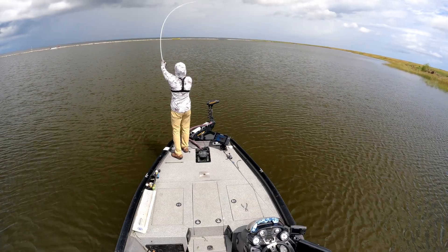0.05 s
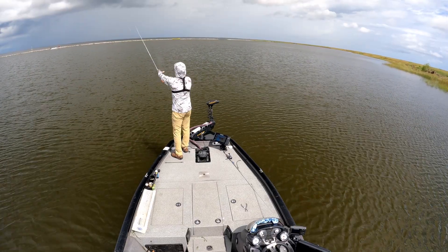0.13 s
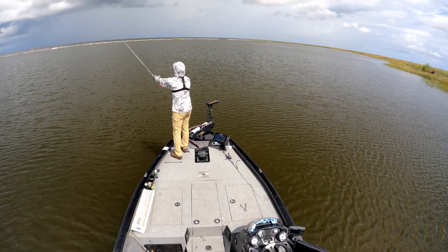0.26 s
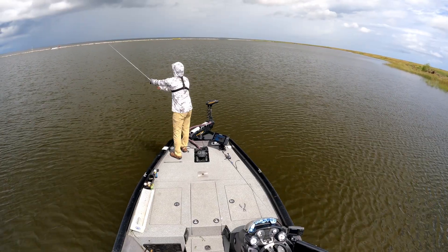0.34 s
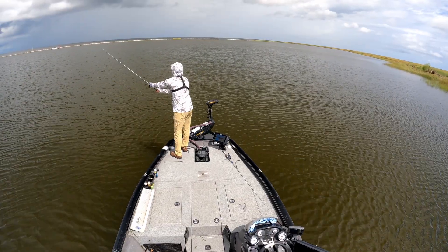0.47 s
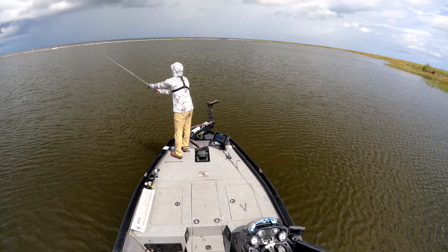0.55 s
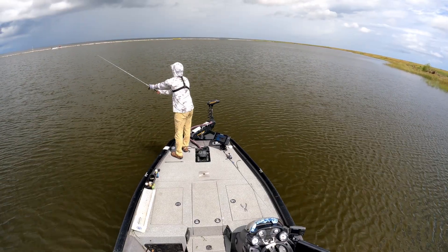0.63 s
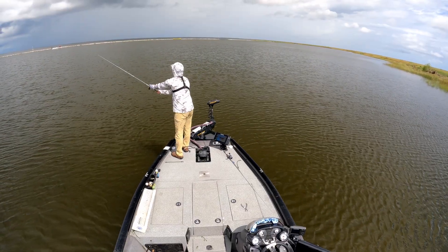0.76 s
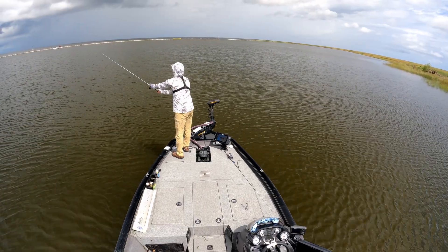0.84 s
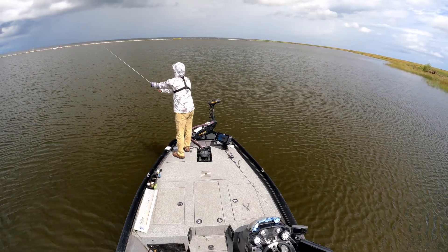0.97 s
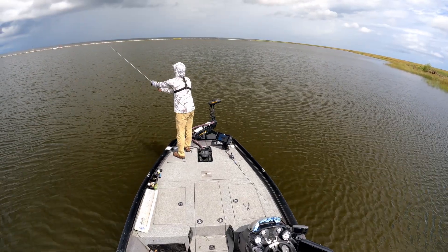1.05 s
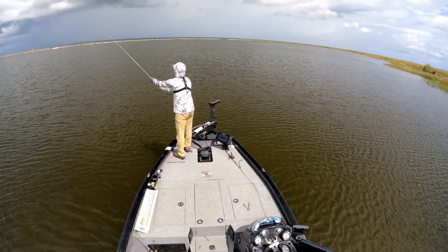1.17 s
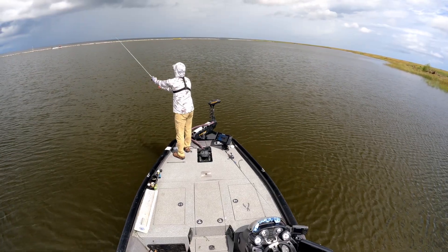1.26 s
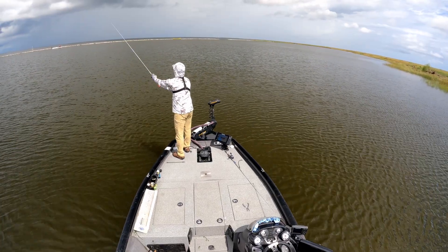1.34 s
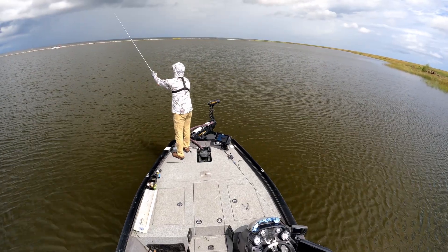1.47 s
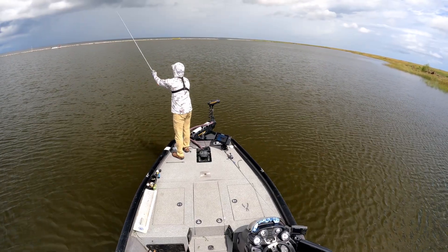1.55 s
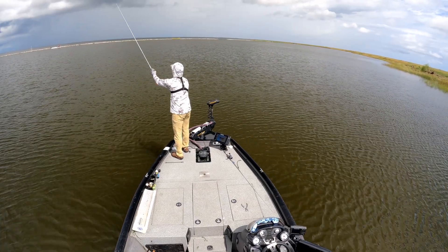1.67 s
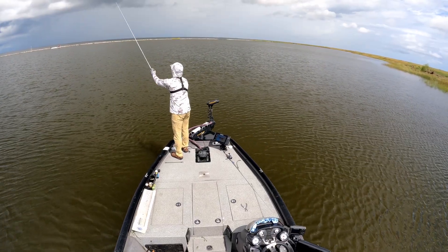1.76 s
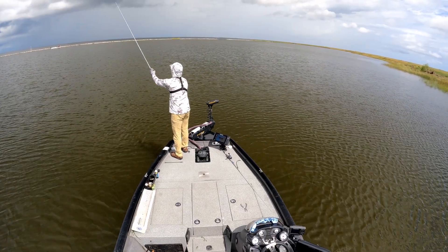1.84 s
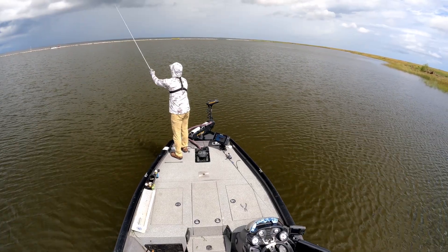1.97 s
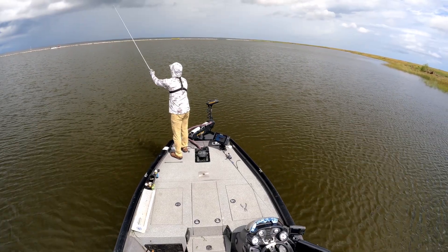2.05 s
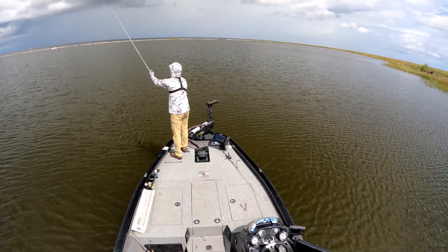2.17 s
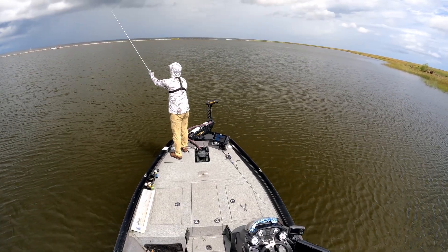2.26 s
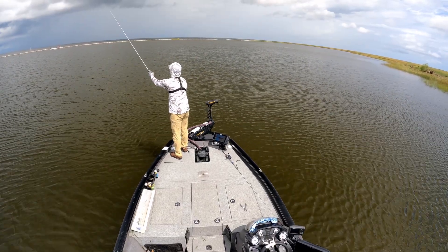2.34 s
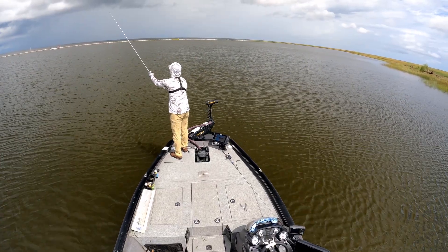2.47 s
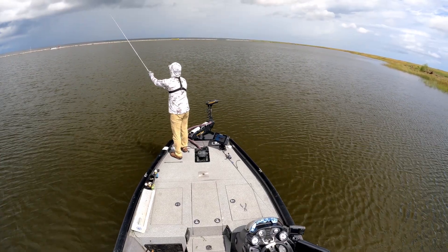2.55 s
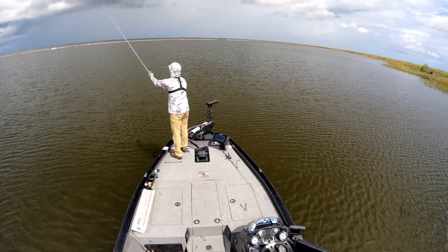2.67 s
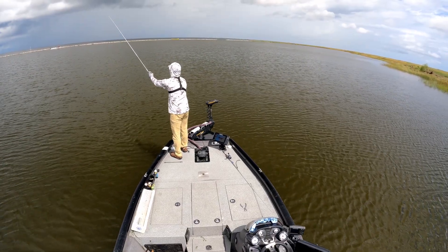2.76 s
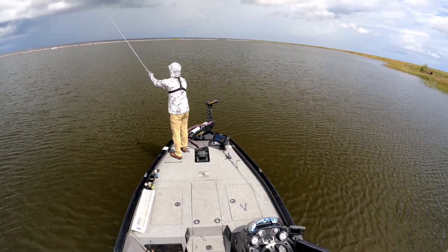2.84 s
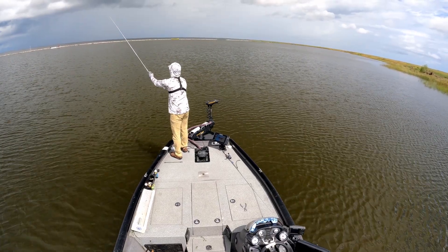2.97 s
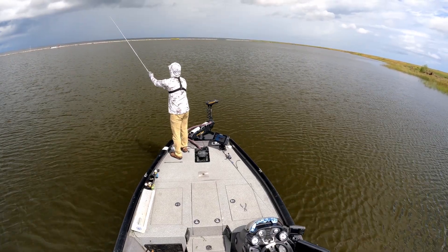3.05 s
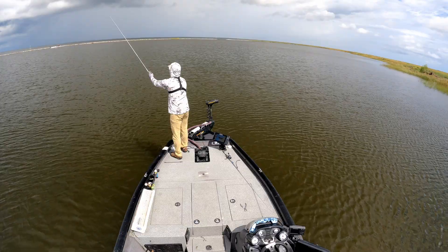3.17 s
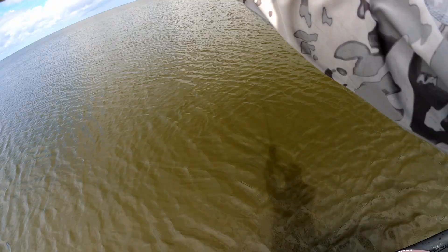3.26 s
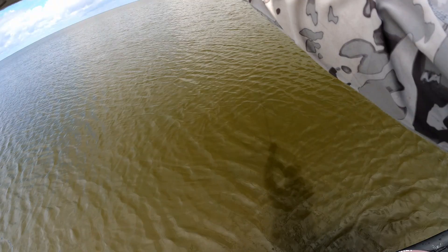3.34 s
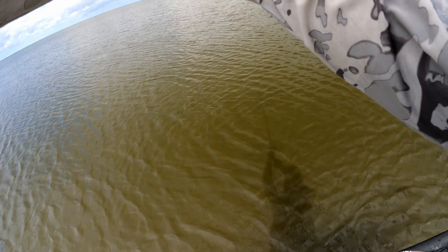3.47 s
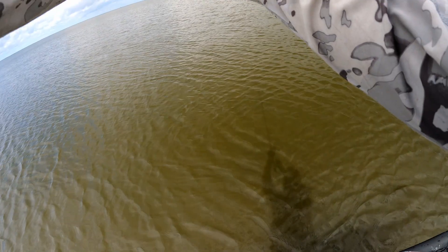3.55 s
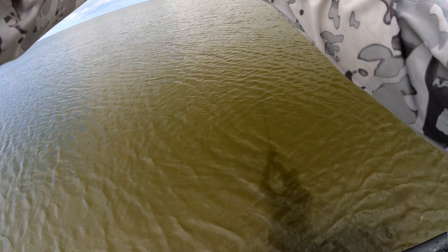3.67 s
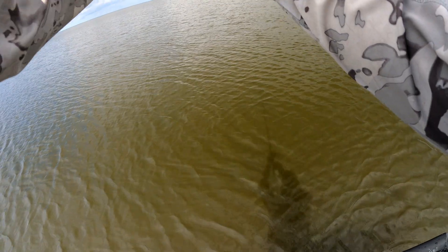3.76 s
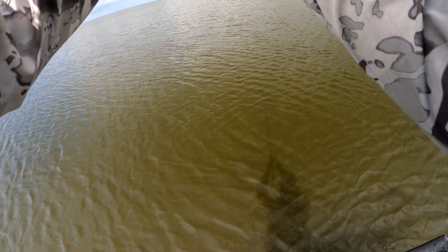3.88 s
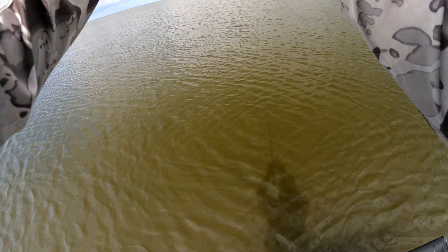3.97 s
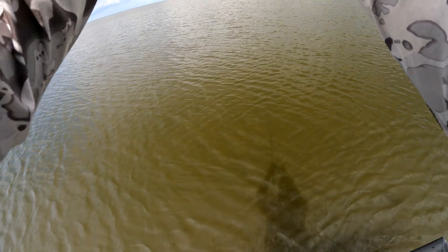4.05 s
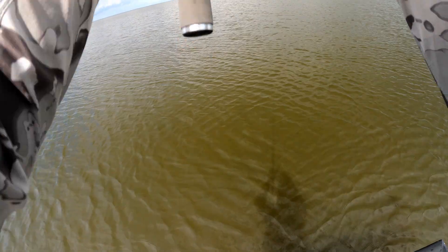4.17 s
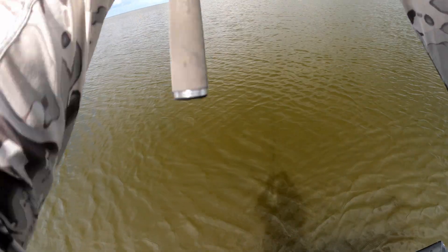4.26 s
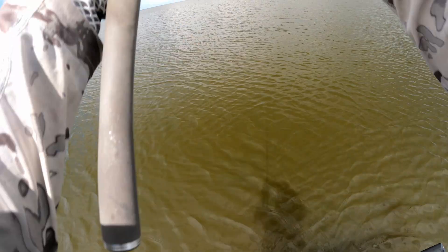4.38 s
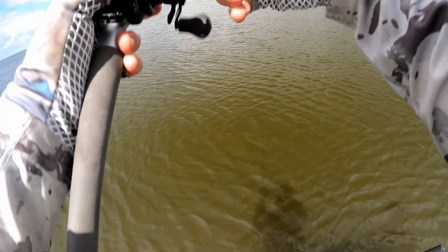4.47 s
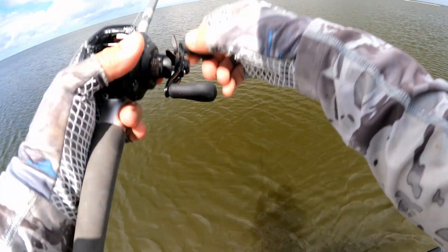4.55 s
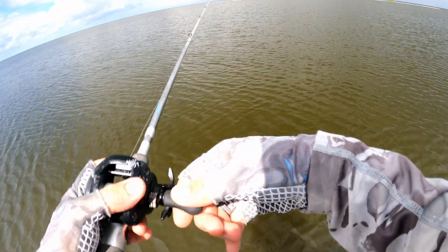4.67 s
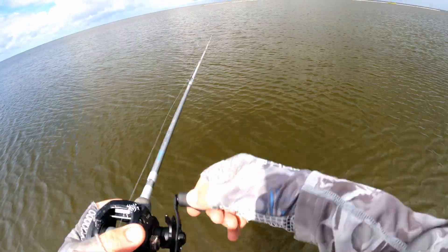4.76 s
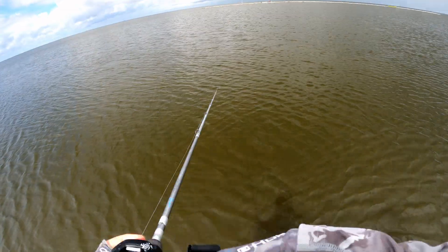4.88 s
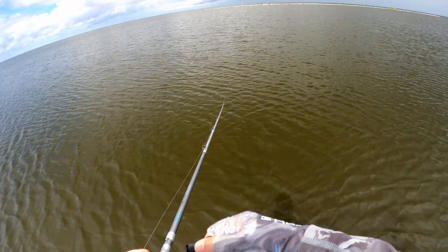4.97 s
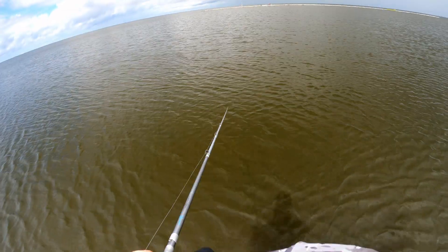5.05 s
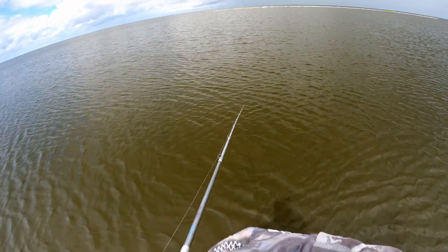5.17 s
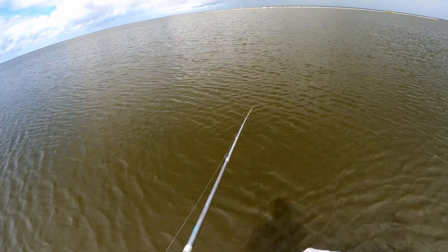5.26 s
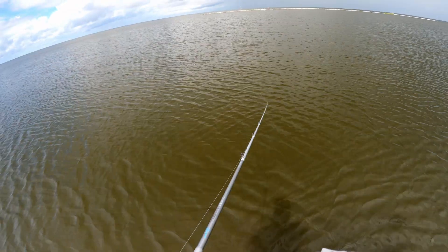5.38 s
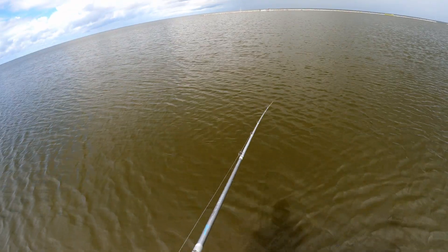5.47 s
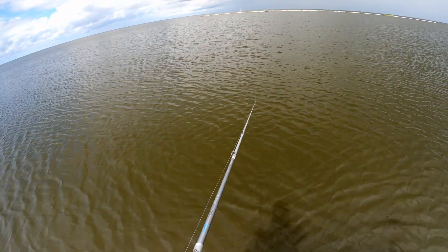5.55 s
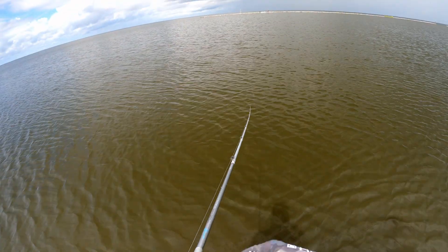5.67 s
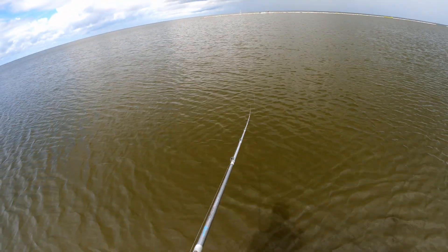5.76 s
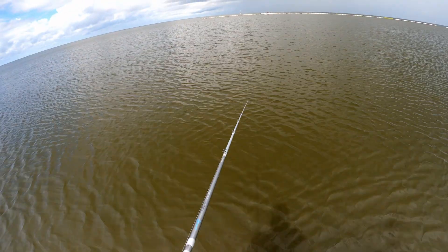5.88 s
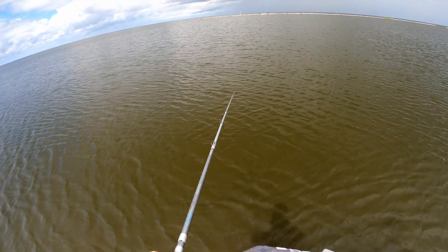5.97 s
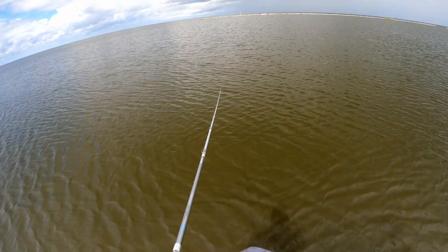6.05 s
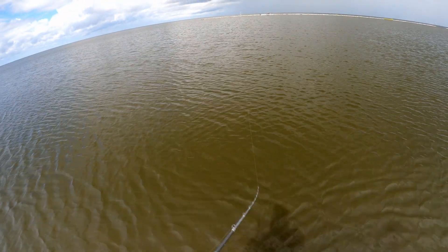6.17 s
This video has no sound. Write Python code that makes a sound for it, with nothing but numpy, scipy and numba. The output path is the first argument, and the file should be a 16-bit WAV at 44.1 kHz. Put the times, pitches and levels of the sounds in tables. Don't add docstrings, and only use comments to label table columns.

```python
import sys
import numpy as np
from scipy import signal
from scipy.fft import rfft, irfft
from scipy.io import wavfile
from scipy.ndimage import uniform_filter1d
from numba import njit

SR = 44100
rng = np.random.default_rng(int(sys.argv[2]) if len(sys.argv) > 2 else 0)


def int16_out(signal):
    q = np.round(np.clip(np.atleast_2d(signal).T, -1, 1) * 32767)
    wavfile.write(sys.argv[1], SR, q.astype(np.int16))


def volts_from_decibels(level):
    exponent = np.asarray(level, float) / 20
    return 10 ** exponent


N = 274294
T = np.arange(N) / SR


def unit(x):
    return x / np.sqrt(np.mean(x ** 2))


def curves(table):
    s, *columns = np.transpose(table)
    gate = uniform_filter1d(1. * ((T > s[0]) & (T < s[-1])), size=441)
    return [np.interp(T, s, c) for c in columns] + [gate]


def step(s, width_s):
    return .5 + .5 * np.tanh((T - s) / width_s)


def bump(s, width_s):
    return np.exp(-((T - s) / width_s) ** 2)


def phase(hz):
    return 2 * np.pi * np.cumsum(hz) / SR


@njit
def svf(x, hz, width):
    y, b, l = np.empty(len(x)), 0., 0.
    for i in range(len(x)):
        g, k = np.tan(np.pi * hz[i] / SR), width / hz[i]
        v = (b + g * (x[i] - l)) / (1 + g * (g + k))
        b, l, y[i] = 2 * v - b, l + 2 * g * v, k * v
    return y


def ring(x, modes):
    out = 0
    for k, (hz, width, db) in enumerate(modes):
        centre = np.full(len(x), min(1. * hz, .45 * SR))
        out = out + (-1) ** k * volts_from_decibels(db) * svf(x + 1e-18, centre, 1. * width)
    return out


def band(lo_hz, hi_hz, order=2):
    edges = signal.butter(order, [lo_hz, hi_hz], "band", fs=SR, output="sos")
    return unit(signal.sosfilt(edges, rng.standard_normal(N)))


def walk(rate):
    k = int(SR / rate)
    held = np.repeat(rng.standard_normal(N // k + 1), k)
    return unit(uniform_filter1d(uniform_filter1d(held, k), k)[:N])


def gritty(spread_db):
    return rng.standard_normal(N) * volts_from_decibels(spread_db * walk(900))


# pitch in Hz, level in dB at first, level in dB after the turn, turn in seconds.
ENGINE = [(89.4, -56, -62.5, 4.3), (107.8, -60, -79, 4.3), (161.2, -61, -77, 4.3), (138.6, -76, -65, 3.5),
          (200, -73.5, -85, 5), (329, -68, -81.5, 2.84)]
# frequency in Hz, level in dB per Hz.
AIR_COLOUR = [(35, -29), (60, -14), (100, 0), (207, -9), (256, -17), (330, -20), (480, -30.5), (785, -17.5),
              (1060, -27.5), (2840, -27.5), (3670, -29), (14900, -33.5), (16000, -34)]


def distance():
    hum = 0
    for hz, first_db, later_db, s in ENGINE:
        level_db = first_db + (later_db - first_db) * step(s, 0.33) + walk(5.1)
        hum = hum + volts_from_decibels(level_db) * np.sin(phase(hz * (1 + 0.00586 * walk(3))))
    hz, db = np.transpose(AIR_COLOUR)
    colour = volts_from_decibels(np.interp(np.log(np.arange(N // 2 + 1) * SR / N + 1), np.log(hz), db))
    air = unit(irfft(colour * rfft(rng.standard_normal(N)), N))
    return np.sqrt(2) * hum + volts_from_decibels(-61.5) * air


# time in seconds, gust level in dB.
GUSTS = [(0, -43.5), (.07, -22.5), (.11, -26), (.17, -48), (.4, -40.5), (.6, -46.5), (.85, -60.5),
         (1.07, -49.5), (1.35, -58), (1.6, -55.5), (2.45, -56), (2.72, -61), (3.25, -55.5), (3.8, -54),
         (4.25, -47), (4.7, -41.5), (5.0, -60), (6.22, -61.5)]


def wind():
    gust_db, _ = curves(GUSTS)
    over_breeze_db = gust_db + 55
    heave_db = -38 + 0.32 * over_breeze_db + 7.5 * walk(4.43)
    rumble_db = gust_db + 1.1 * walk(4.3) + 2.0 * walk(16)
    flutter_db = -63 + 0.83 * over_breeze_db + 1.7 * walk(12)
    gusts = volts_from_decibels(np.minimum(heave_db, -28)) * band(2.0, 10.85)
    gusts += volts_from_decibels(rumble_db) * band(6.6, 62) + volts_from_decibels(flutter_db) * band(37, 320)
    slap_s, swing_hz = .07, 9.5
    t = np.clip(T - slap_s, 0, None)
    suction = volts_from_decibels(-7.5) * np.clip(T / slap_s, 0, 1) ** 0.9 * np.exp(-t / 0.0044)
    swing = volts_from_decibels(-5.5) * np.sin(2 * np.pi * swing_hz * t) * np.exp(-t / 0.076)
    late_puff = volts_from_decibels(-12.5) * bump(0.318, 0.027)
    fade_out = np.clip((T[-1] - T) / .06, 0, 1)
    return fade_out * (gusts - .0014) + swing - suction + late_puff


# time in seconds, effort in dB.
ARMS = [
    (3.3, -70.5),
    (3.6, -70),
    (4.0, -70.5),
    (4.25, -66),
    (4.52, -57),
    (4.76, -56.5),
    (4.9, -65.5),
    (5.8, -66.5),
    (6.3, -81.5),
]


def sleeves():
    cloth_db, gate = curves(ARMS)
    grip_db = 6.5 * step(4.02, 0.012)
    fumble_db = -70.5 + grip_db + 0.59 * (cloth_db - cloth_db.mean())
    fine_db = cloth_db - 2 - 5.5 * step(4.79, .08)
    crease = volts_from_decibels(2.0 * walk(60) + 2.0 * walk(300))
    rustle = volts_from_decibels(fumble_db) * band(243, 980) + volts_from_decibels(cloth_db) * band(900, 3570)
    return gate * crease * (rustle + volts_from_decibels(fine_db) * band(3600, 13000))


# resonance in Hz, width in Hz, level in dB.
RIM_NOTES = [(230, 70, 0), (450, 200, -4), (780, 140, 2), (1100, 80, 2), (1600, 90, -6), (2200, 140, -6),
             (2950, 130, -2), (3900, 130, -11), (4800, 250, -12), (7600, 500, -15)]


def thumb_rub():
    from_s, to_s = 4.025, 4.168
    rub_db = -52 - 50 * np.abs(T - from_s)
    gate = step(from_s, .001) - step(to_s, .006)
    thud = volts_from_decibels(6.5 * np.exp(-((T - from_s) / 0.07) ** 2))
    climb = phase(1 + 0.067 * np.tanh((T - 4.07) / 0.059) / 2 + 0.013 * walk(80))
    rub = 0
    for hz, width, db in RIM_NOTES:
        rough = ring(ring(rng.standard_normal(N), [(hz, width, 0)]), [(hz, 4 * width, 0)])
        squeak = 0.79 * volts_from_decibels(3.3 * walk(60)) * np.sin(hz * climb)
        note = volts_from_decibels(db) * np.sqrt(width) * (unit(rough) + squeak)
        if hz < 1200:
            note = note * thud
        rub = rub + note
    return gate * volts_from_decibels(rub_db) * unit(rub)


# knob snap in seconds, snap level in dB, lead of the slack's tap in seconds,
# tap level in dB.
HANDLE = [
    (4.9782, -33, .018, -60),
    (5.119, -27.5, 0.026, -57),
    (5.2069, -29, 0.02, -38.5),
    (5.3321, -26, 0.029, -36.5),
    (5.438, -25.5, .0259, -33.5),
    (5.5696, -25, 0.029, -36.5),
    (5.672, -26.5, 0.02, -34.5),
]
# time in seconds, effort in dB, mesh resonance in Hz.
CRANKING = [
    (4.22, -58.5, 823),
    (4.65, -62, 844),
    (4.85, -66, 790),
    (5.15, -61, 873),
    (5.5, -59, 856),
    (5.68, -64.5, 780),
    (5.76, -59, 751),
    (5.85, -63.5, 846),
    (6.0, -80, 785),
]


def gears():
    gear_db, gear_hz, gate = curves(CRANKING)
    gear_db = gear_db + 10 * np.exp(-np.abs(T - CRANKING[0][0]) / .03)
    snaps = np.transpose(HANDLE)[0]
    push = np.interp(T, snaps, np.arange(len(snaps))) % 1
    gear_hz = gear_hz * (1 + .12 * uniform_filter1d((push - .5) * (push > 0), size=900))
    teeth = gritty(1.7)
    mesh = unit(svf(svf(teeth, gear_hz, 70.), gear_hz, 110.))
    mesh += 0.3 * np.sin(phase(gear_hz * (1 + 0.019 * walk(35))))
    mesh += 0.41 * unit(svf(teeth, gear_hz, 260.))
    mesh += volts_from_decibels(-10) * unit(ring(teeth, [(2024, 113, 6.5), (1660, 120, -3), (3050, 150, -10)]))
    crumbs_per_s, crumb_s = 40, 0.0018
    hits = (rng.random(N) < crumbs_per_s / SR) * rng.random(N)
    crumbs = signal.lfilter([1], [1, -np.exp(-1 / (crumb_s * SR))], hits)
    grit = volts_from_decibels(gear_db + 5.5) * crumbs * band(2200, 4600)
    return gate * (grit + volts_from_decibels(gear_db + 3.0 * walk(25)) * mesh)


# time in seconds, level in dB, pitch in Hz, glide as a share, 60 dB decay in seconds.
SPLASH = [
    (3.487, -30.5, 1300, -0.57, 0.021),
    (3.548, -38.5, 433, 0.21, 0.049),
    (3.554, -46, 1620, 0.058, 0.024),
]


def plops():
    out = 0
    for s, db, hz, glide, t60 in SPLASH:
        t = np.clip(T - s, 0, None)
        bubble = np.sin(2 * np.pi * hz * t * (1 + glide * t / t60)) + .5 * band(0.85 * hz, 1.2 * hz)
        out = out + volts_from_decibels(db) * (1 - np.exp(-t / 0.0028)) * np.exp(-np.log(1000) * t / t60) * bubble
    return out


# resonance in Hz, width in Hz, level in dB.
KNOCK_BODY = [(1875, 510, -0.5), (2696, 650, -1.5), (2896, 1280, -2.5)]
HOLLOW_BODY = [(1274, 290, 1), (799, 107, 6.5), (503, 610, -3.5)]
STEEL_PARTS = [(4380, 1600, -8.5), (6320, 780, -6.5), (7280, 2850, -5.5)]
TINKLE_BITS = [(10940, 8200, -5), (13960, 433, 5), (14900, 1100, -6.5)]
PAWL_BITE = [(2960, 460, 5), (4200, 2100, -5.5), (4430, 620, 4)]


def knocks(events, lead_s, lead_db, chatter_s, tail_s, tail_db):
    bodies = KNOCK_BODY, HOLLOW_BODY, STEEL_PARTS, TINKLE_BITS, PAWL_BITE
    size, early = SR // 16, SR // 100
    out, t = np.zeros(N + size), (np.arange(size) - early) / SR
    after = np.clip(t, 0, None)
    rise = 1 - np.exp(-after / .0003)
    lead = volts_from_decibels(lead_db) * (t < 0) * np.exp(-(t / lead_s) ** 2)
    for s, *parts_db in events:
        chance = rng.standard_normal(size)
        start = int(s * SR) - early
        for db, body in zip(parts_db, bodies):
            hz = body[1][0]
            quick = (hz / 2500) ** 0.216
            chatter = np.exp(-after * quick / chatter_s)
            tail = volts_from_decibels(tail_db) * np.exp(-after * quick / tail_s)
            sound = ring(ring(chance * (lead + rise * (chatter + tail)), body), [(hz, 1.23 * hz, 0)])
            out[start:start + size] += volts_from_decibels(db + 0.5) * sound / np.abs(sound).max()
    return out[:N]


# time in seconds, then knock, hollow, steel and tinkle in dB.
CAST_TICKS = [
    (0.0122, -32, -51, -42, -33),
    (0.0182, -48, -42, -29, -28),
    (0.0242, -13.5, -53, -20.5, -49),
    (0.1162, -27, -30, -31, -47),
    (0.1494, -29, -27, -22, -21.5),
    (0.1764, -20, -46, -13.5, -18),
    (0.2054, -46, -33, -28.5, -29),
]
# time in seconds, then knock, hollow and steel in dB.
LOOSE_PARTS = [(3.4122, -53, -60, -52), (3.556, -53, -55, -60), (3.9398, -57, -66, -46.5),
               (4.2513, -41, -34.5, -57), (4.3, -40, -42.5, -47), (4.3274, -32, -34, -37),
               (4.3664, -19.5, -27, -24), (4.3914, -43, -44, -59), (4.4465, -47, -56, -52),
               (4.486, -26, -37, -28.5), (4.6818, -55, -40, -37), (4.725, -33, -43, -33.5),
               (4.8309, -51, -51, -43), (6.123, -45.5, -53.5, -69)]
# knock, hollow, steel and tinkle in dB over the blow.
SNAP_PARTS = (-2, -14, -3.5, -24)
TAP_PARTS = (0.5, 0, -6.5, -15)


def ticks():
    blows = list(CAST_TICKS)
    for s, knock_db, hollow_db, steel_db in LOOSE_PARTS:
        shaken_db = 0.52 * max(knock_db + 39, 0)
        blows.append((s, knock_db, hollow_db, steel_db, steel_db - 12 + shaken_db))
    for snap_s, snap_db, lead_s, tap_db in HANDLE:
        blows.append((snap_s, *(snap_db + np.array(SNAP_PARTS))))
        blows.append((snap_s - lead_s, *(tap_db + np.array(TAP_PARTS))))
    return knocks(blows, lead_s=0.0041, lead_db=-28.0, chatter_s=0.00082, tail_s=0.0055, tail_db=-19)


# time in seconds, then knock, hollow, steel and tinkle in dB.
CLACKS = [
    (4.1687, -31, -32.5, -33, -29.5),
    (4.1793, -42.5, -38, -38, -38.5),
    (4.1889, -4.5, -5, -13, -6),
    (4.2087, -9, -18, -6, -14.5),
]


def clutch():
    bitten = [(*row, row[2] - 4.5) for row in CLACKS]
    clacks = knocks(bitten, lead_s=0.00024, lead_db=-23.5, chatter_s=.0005, tail_s=0.0058, tail_db=-23)
    spring_hz, t60_s = 12550, .11
    spring = 0
    for s, *_ in CLACKS[2:]:
        t = np.clip(T - s, 0, None)
        spring = spring + np.exp(-np.log(1000) * t / t60_s) * np.sin(2 * np.pi * spring_hz * t)
    return clacks + volts_from_decibels(-40 + 5.6 * walk(350)) * spring


# time in seconds, pull in dB, singing guide in Hz.
RUNNING_LINE = [
    (.24, -47, 7400),
    (.55, -47.5, 7500),
    (1.0, -52.5, 7470),
    (1.54, -52, 7370),
    (1.85, -55, 7900),
    (2.46, -59, 7460),
    (3.14, -60.5, 7600),
    (3.45, -65, 7800),
    (3.7, -73, 7800),
]
# time in seconds, level in dB, length in seconds.
LIP_SWEEPS = [(0.378, -76.5, .01), (0.442, -71.5, 0.011), (.5, -72, .01), (.57, -83, 0.013),
              (.65, -67, .01), (.7, -65, .012), (0.848, -77, 0.015), (0.995, -67, 0.023),
              (1.173, -70, .016), (1.368, -64, 0.012), (1.58, -71, .016), (1.83, -72, .02),
              (2.138, -71, .022), (2.3, -69, .006), (2.498, -78, .025), (2.96, -70, .035),
              (3.385, -64, .006)]
# resonance in Hz, width in Hz, level in dB.
REEL_FRAME = [(842, 295, -0.5), (1616, 230, 0.5), (2030, 550, -1), (2554, 350, 2.5), (3044, 680, -6.5)]
ROD_GUIDES = [(4670, 1700, 0), (5960, 1330, 0.5), (8330, 800, -3.5)]
# centre in Hz, width in Hz, share removed.
ROD_SHADOWS = [(6800, 900, 0.63), (3800, 240, 0.8)]


def line():
    frame_db, sing_hz, gate = curves(RUNNING_LINE)
    guide_db = frame_db - 6.5 - 3 * np.minimum(T, 1.9)
    scrape = sum(volts_from_decibels(db) * bump(s, length_s) for s, db, length_s in LIP_SWEEPS)
    fast = 1 / (1 + np.exp((T - 1.5) / 0.22))
    grit = gritty(2.0)
    lip = unit(ring(ring(grit, [(14000, 1000, 0)]), [(14000, 1500, 0)]))
    lip = lip + 1.7 * fast * unit(ring(grit, [(15300, 1300, 5), (12300, 2900, -7)]))
    braid = gritty(1.0)
    singing = svf(svf(braid, sing_hz, 1530.0), sing_hz, 2060.0)
    guides = unit(ring(braid, ROD_GUIDES) + volts_from_decibels(2.5) * singing)
    flicker = volts_from_decibels(.6 * walk(12))
    hiss = volts_from_decibels(frame_db - 4.5) * unit(ring(gritty(0.99), REEL_FRAME)) + volts_from_decibels(guide_db) * guides
    for hz, width, share in ROD_SHADOWS:
        hiss = hiss - share * step(1.3, 0.2) * ring(hiss, [(hz, width, 0)])
    return gate * (flicker * hiss + scrape * lip + volts_from_decibels(guide_db - 8.5) * band(12000, 16500))


# time in seconds, effort in dB.
ROD_SWING = [
    (0, -48.5),
    (.05, -48.5),
    (.09, -43),
    (.112, -46),
    (.125, -38.5),
    (.15, -28),
    (.185, -36),
    (.225, -42.5),
    (.3, -60),
]


def whip():
    rush_db, gate = curves(ROD_SWING)
    effort_db = rush_db - rush_db[0]
    tear = volts_from_decibels(1.8 * walk(250))
    rush = unit(ring(rng.standard_normal(N), [(696, 360, -0.77), (1736, 690, -1.2), (2670, 1040, -1.8)]))
    hiss = volts_from_decibels(-51 + 0.36 * effort_db) + volts_from_decibels(-36) * bump(.174, .028)
    tip_db = -52.5 + 13 * (step(0.11, .006) - step(0.208, .012)) + np.minimum(effort_db, 0)
    bright = hiss * band(4000, 8500, order=3) + volts_from_decibels(tip_db) * band(9100, 18600, order=3)
    return gate * tear * (volts_from_decibels(rush_db) * rush + bright)


# time in seconds, turn rate in Hz.
SPOOL_SPEED = [
    (.18, 340),
    (.225, 397.2),
    (.36, 368.8),
    (.5, 361.3),
    (.9, 282),
    (1.3, 222.3),
    (1.75, 174.7),
    (1.95, 151.3),
    (2.3, 125.7),
]
# centre in Hz, half width in Hz, level in dB.
WHINE_PEAKS = [(2438, 39, -51), (2160, 130, -55.5), (1880, 67, -57), (1576, 90, -54.5), (1140, 290, -72.5)]
TURN_MULTIPLES = [2.5, -5, -8.5, -9.5, -32, -13]
BALL_BEATS = [-7, -3.5, -11, -38, -9.5, -8.5, -18]
DOUBLE_BEATS = [-11.5, -27, -19, -14.5, -11, -16, -9, -27]


def spool():
    turns_hz, gate = curves(SPOOL_SPEED)
    balls = 6.42
    slower = np.log2(turns_hz / 370)
    brake_db = 19 * np.clip(T - 1.7, 0, None)
    seated_db = -25 * (1 - step(0.19, 0.0084)) - brake_db
    unbalance_db = -43.5 + 29 * slower - 3.0 * brake_db
    bearing_db = -51 + 5.5 * slower + seated_db
    peaks = sum(volts_from_decibels(db) / (1 + ((balls * turns_hz - hz) / half) ** 2) for hz, half, db in WHINE_PEAKS)
    whine_db = seated_db + 20 * np.log10(peaks)
    turn = phase(uniform_filter1d(turns_hz, size=1500) * (1 + 0.00223 * walk(29.93)))
    waver_db, waver_rad = 3.3, .8

    orders = np.r_[np.arange(2, 8), balls + np.arange(-3, 4), 2 * balls + np.arange(-7, 1)]
    orders_db = [*TURN_MULTIPLES, *BALL_BEATS, *DOUBLE_BEATS]
    lines = 0
    for k, db in zip(orders, orders_db):
        lines = lines + volts_from_decibels(db + waver_db * walk(8.18)) * np.sin(k * turn + waver_rad * walk(25.82))
    live = ring(gate * volts_from_decibels(bearing_db) * lines, [(1600, 990, 0)])
    live = ring(live, [(1280, 7200, 0)])

    kick = volts_from_decibels(2) * bump(.22, 0.029) * np.sin(2 * turn)
    unbalance = volts_from_decibels(unbalance_db + 1.3 * walk(14.0)) * (np.sin(turn) + kick)
    whine = volts_from_decibels(whine_db + waver_db * walk(17.38)) * np.sin(balls * turn + waver_rad * walk(25.5))
    return np.sqrt(2) * (gate * (unbalance + whine) + 0.18 * live + 1.04 * ring(live, REEL_FRAME))


def scene():
    top_hz = 15780
    steady = distance() + wind() + sleeves() + thumb_rub() + gears() + plops() + line() + whip() + spool()
    sharp = ticks() + clutch()
    edge = signal.ellip(10, .2, 40, top_hz, fs=SR, output="sos")
    spill = signal.butter(14, 1.01 * top_hz, fs=SR, output="sos")
    return (signal.sosfilt(edge, steady) + signal.sosfilt(spill, sharp))[None]


def low_pass(x):
    return signal.sosfilt(signal.butter(12, 17150, fs=SR, output="sos"), x)


def record(dry):
    return low_pass(dry)


dry = scene()
out = record(dry)
int16_out(out)
```